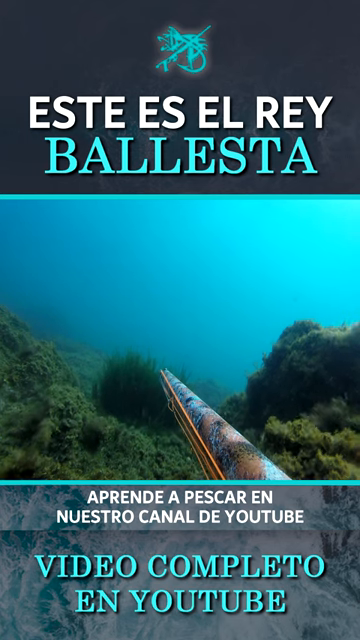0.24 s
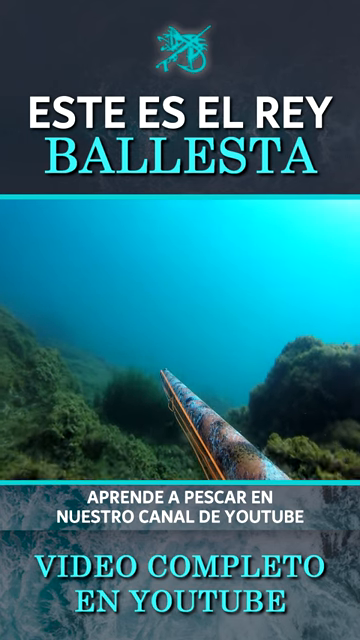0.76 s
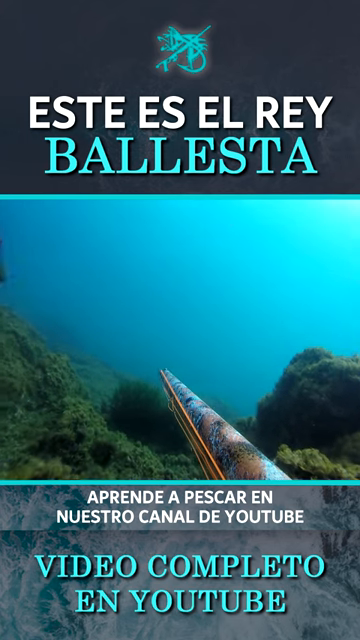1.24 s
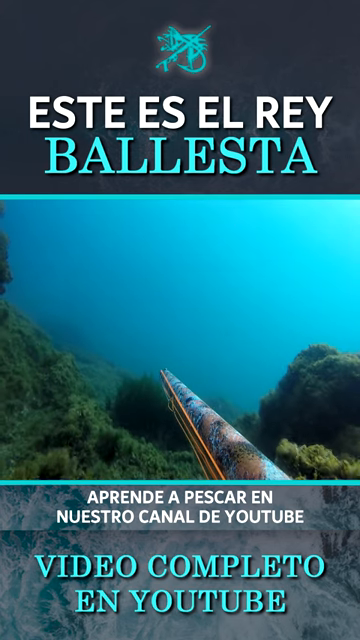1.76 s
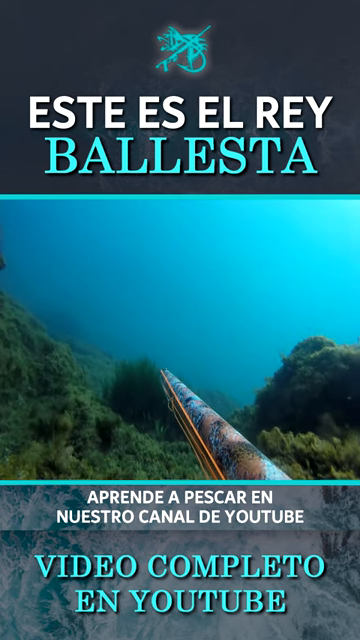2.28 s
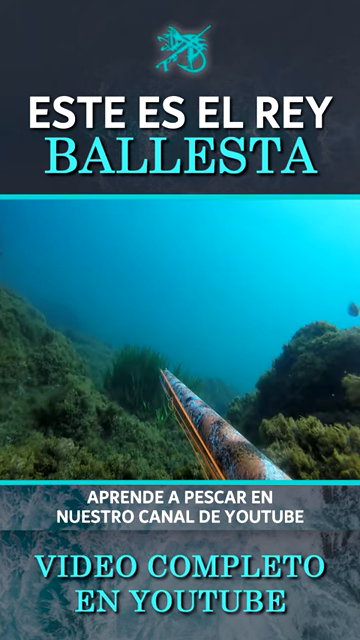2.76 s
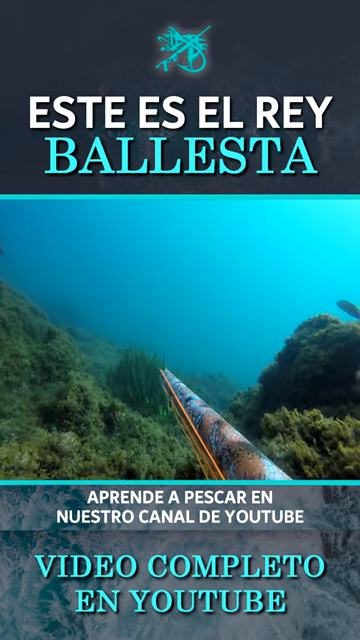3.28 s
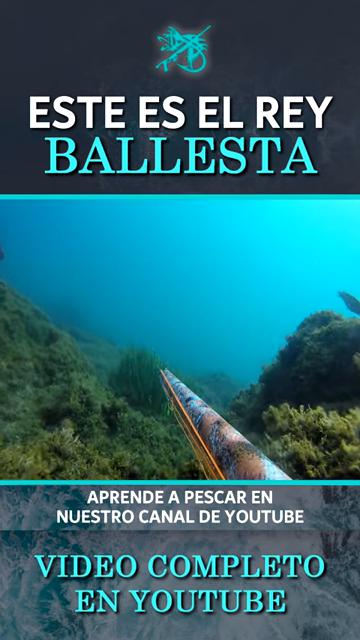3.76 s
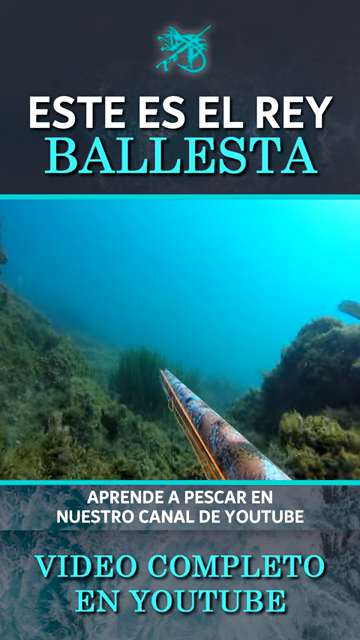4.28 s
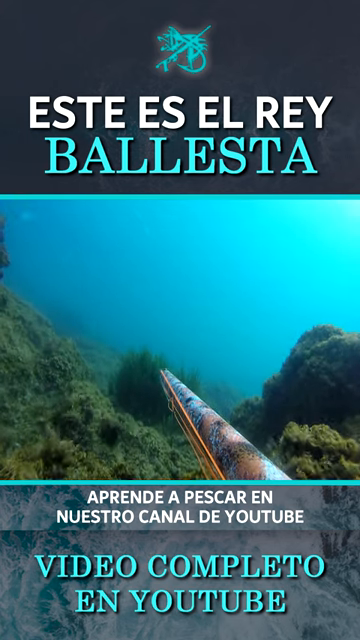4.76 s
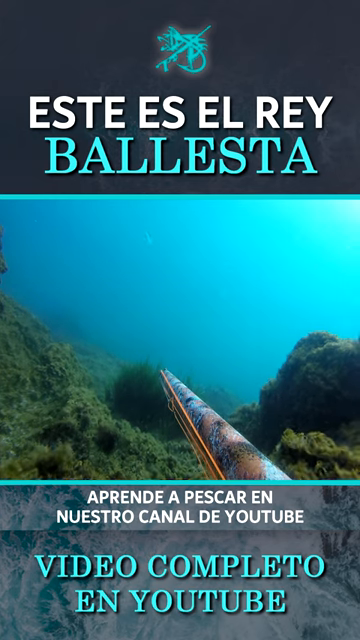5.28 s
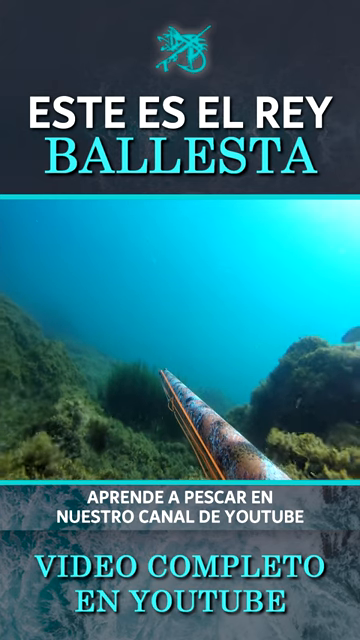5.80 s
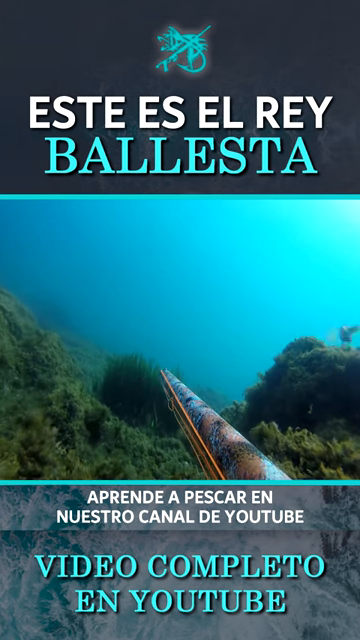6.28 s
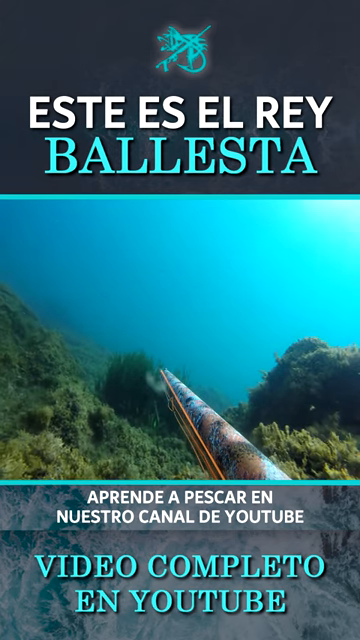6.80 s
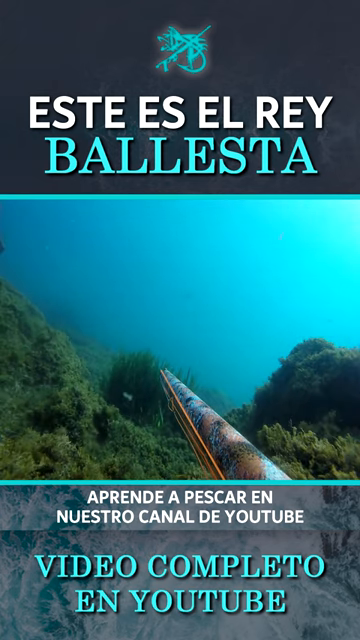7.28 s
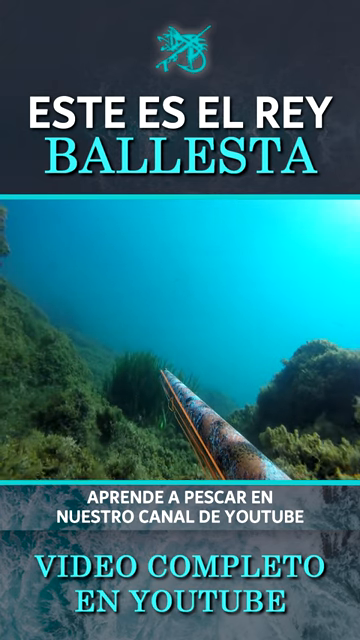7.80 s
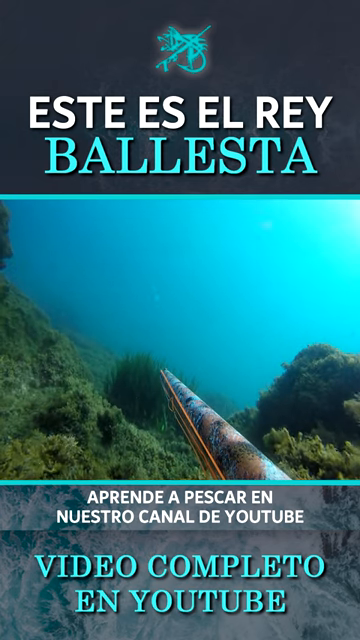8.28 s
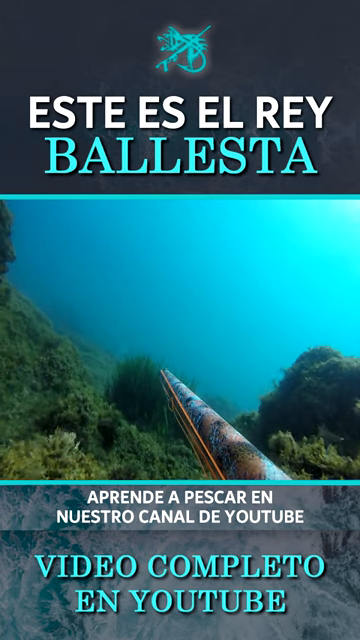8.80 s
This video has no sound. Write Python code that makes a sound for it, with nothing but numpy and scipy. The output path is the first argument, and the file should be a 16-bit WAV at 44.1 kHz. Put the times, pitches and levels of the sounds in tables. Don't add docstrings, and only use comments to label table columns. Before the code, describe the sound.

A microphone sealed in a housing on a speargun hears a rocky sea bed. Continuous soft hiss, fine crackle from countless distant shrimp and a very faint high whine fill the roughly nine seconds. In the first second the gun jolts, with dull knocks, low sway, buzzing shake and glove rubbing, amid small clicks. At 1.7 a dry, extremely loud snap cracks out, ringing briefly in the midrange. Another strong, softer-edged snap comes at 2.3, then a heavy thud and jolt at 2.45. Bright ticks cluster around 3.1; knocks return from 3.7 to 4.6, with low movement near 4. A sharp, loud double snap hits at 5.0. Scattered snaps continue, some crisp, some smeared by rocks, with a dull knock and shake around 6.5 and another at 7.7. The handling then calms; fuller snaps sound at 8.2 and 8.6, with smaller clicks to the end.

```python
import sys
import numpy as np
from scipy import signal
from scipy.io import wavfile
from scipy.ndimage import uniform_filter1d

SR = 44100
rng = np.random.default_rng(int(sys.argv[2]) if len(sys.argv) > 2 else 0)


def nominal_scale(level):
    x = np.asarray(level, float) / 20
    return 10 ** x


def store_pcm(level_fs):
    pcm = np.round(np.clip(level_fs, -1, 1) * 32767).astype(np.int16)
    wavfile.write(sys.argv[1], SR, np.atleast_2d(pcm).T)


N = 399105

# f/Hz, width/Hz, level/dB
HOUSING = [(765, 112, -18), (1461, 83, -2), (1850, 170, -3), (2338, 325, -3.5), (2723, 165, 2.5),
           (3130, 77, -4.5), (3617, 160, -6), (4134, 650, -5), (5070, 350, -18), (6310, 260, -19.5)]
# f/Hz, width/Hz, level/dB
GRIP = [(213, 102, 5.5), (366, 65, 1), (518, 48, -6)]


def rms_one(x):
    return x / np.sqrt(np.mean(x ** 2) + 1e-20)


def band(x, low_hz, high_hz):
    return signal.sosfilt(signal.butter(2, [low_hz, high_hz], "band", fs=SR, output="sos"), x)


def steep(x, low_hz, high_hz):
    return band(band(x, low_hz, high_hz), low_hz, high_hz)


def steady(x):
    return x / np.sqrt(uniform_filter1d(x ** 2, size=5000) + 1e-12)


def fading(x, rate_per_s):
    return signal.lfilter([1], [1, -np.exp(-rate_per_s / SR)], x)


def resonate(x, modes):
    out = np.zeros(x.shape)
    for hz, width, db in modes:
        r = np.exp(-np.pi * width / SR)
        poles = [1, -2 * r * np.cos(2 * np.pi * hz / SR), r * r]
        out += nominal_scale(db) * signal.lfilter([1 - r * r, 0, r * r - 1], poles, x)
    return out


def arrivals(t60, build_ms, size):
    t = np.arange(size) / SR
    build = max(build_ms, 0.05) / 1000
    after = np.maximum(t - build, 0) / max(t60, 0.004)
    rise = np.minimum(0.25 + 0.75 * t / build, 1)
    swell = rise * (1.06 * nominal_scale(-200 * after) + 0.7 * nominal_scale(-50 * after))
    spikes = rng.standard_normal(size) * np.sqrt(rng.exponential(1, size)) * swell
    spikes[0] = 70 * np.exp(-build_ms / 0.5)
    return spikes


def add(out, s, peak_db, sound):
    at = round(s * SR)
    loudest = uniform_filter1d(sound ** 2, size=130).max()
    scaled = nominal_scale(peak_db - 7) * sound / np.sqrt(loudest)
    out[at:at + len(sound)] += scaled[:N - at]


def hiss():
    # f/Hz, level per Hz/dB
    colour = [(26, -35), (45, 5.5), (583, -8.5), (781, -8.5), (1100, -13), (1440, -11), (1880, -12),
              (2020, -14), (2710, -11), (3460, -19.5), (6690, -23), (7930, -27), (12600, -33.5),
              (15300, -43)]
    # f/Hz, level/dB
    tones = [(8000, -84), (9000, -87), (12000, -95)]
    edges = 40 * 2 ** np.arange(0, 8.8, 1 / 5)
    white = rng.standard_normal((2, N))
    hz, db = np.transpose(colour)
    noise = np.zeros(N)
    for k, (low, high) in enumerate(zip(edges, edges[1:])):
        band_db = np.interp(np.log(low * high) / 2, np.log(hz), db)
        noise += nominal_scale(band_db) * band(white[k % 2], low, high)
    t = np.arange(N) / SR
    whine = sum(nominal_scale(level) * np.sin(2 * np.pi * f * t) for f, level in tones)
    return nominal_scale(-56) * rms_one(noise) + whine


def far_snaps():
    snaps_per_s = 250
    born = (rng.random(N) < snaps_per_s / SR) * nominal_scale(7.1 * np.minimum(rng.exponential(1, N), 3))
    smear = fading(born, 150)
    crowd = steep(resonate(smear * rng.standard_normal(N), HOUSING), 820, 4110)
    return nominal_scale(-63.5) * rms_one(crowd)


def crackle():
    snaps_per_s = 48
    sizes = nominal_scale(2.1 * np.minimum(rng.exponential(1, N), 3.5)) * (rng.random(N) < snaps_per_s / SR)
    dealt = rng.integers(0, 3, N)
    grit = rng.standard_normal(N)
    colours = [(3420, 6400, -6.5), (6900, 8900, 2), (8460, 13000, -18)]
    out = np.zeros(N)
    for k, (low_hz, high_hz, db) in enumerate(colours):
        struck = sizes * (0.38 + (dealt == k))
        smear = fading(struck, 900) + 0.18 * fading(struck, 120)
        out += nominal_scale(db) * band(smear * grit, low_hz, high_hz)
    return nominal_scale(-70.5) * rms_one(out)


def jolted(rest_db, s, peak_db, hold_s, fall_db_per_s):
    t = np.arange(len(rest_db))[:, None] / 100
    rise_db = 350 * np.maximum(s - t, 0)
    fall_db = fall_db_per_s * np.maximum(t - s - hold_s, 0)
    power = nominal_scale(2 * rest_db) + nominal_scale(2 * (peak_db - rise_db - fall_db)).sum(axis=1)
    return np.interp(np.arange(N) / SR, t[:, 0], np.sqrt(power))


def hand():
    # t/s, level/dB
    restless = [(0, -45.5), (.7, -50), (1.1, -51), (2.39, -62.5), (2.97, -58), (4, -49), (4.33, -53),
                (6.37, -60.5), (6.78, -54.5), (7.6, -54), (7.8, -67), (9.05, -66)]
    # t/s, stock shake level/dB, sway level/dB, rubbing level/dB, hold/s
    jolts = [
        (.01, -37.5, -41, -31.5, 0.024),
        (0.294, -53, -53, -46, 0.093),
        (.52, -51.5, -48, -56, 0.045),
        (0.705, -65, -52, -45, 0.19),
        (0.768, -44, -36, -61, 0.097),
        (2.475, -37.5, -43.5, -36, 0.024),
        (2.57, -47, -40, -49, 0.023),
        (4.014, -56.5, -44.5, -53, 0.027),
        (6.476, -49, -55, -52, 0.12),
        (7.557, -60, -54.5, -53, 0.031),
    ]
    unrest = np.interp(np.arange(N * 100 // SR + 2) / 100, *np.transpose(restless))
    s, shake_db, sway_db, rub_db, hold_s = np.transpose(jolts)
    sway = jolted(unrest - 5, s + 0.051, sway_db, hold_s, 112)
    shake = jolted(-78 + (unrest + 55), s, shake_db, hold_s, 121)
    rubbing = jolted(-56.5 + 0.42 * (unrest + 55), s, rub_db, hold_s, 146)
    white = rng.standard_normal((3, N))
    slips = fading((rng.random(N) < 60 / SR) * rng.exponential(1, N), 120)
    rub = resonate(white[2] * (1 + 0.5 * slips), GRIP + [(727, 110, 6)])
    rub = steep(rub, 80, 840)
    swing = steady(steep(white[0], 12.2, 31.2))
    buzz = steady(band(band(white[1], 64.9, 76.2), 25, 143))
    return nominal_scale(5.0) * sway * swing + shake * buzz + nominal_scale(-10.0) * rubbing * rms_one(rub)


def knocks():
    # t/s, peak level/dB, deep level/dB, bright level/dB, echo t60/s
    blows = [(0.009, -33, -6, -17, 0.031), (0.066, -36, 3, -8, 0.12), (0.271, -54.5, 10, -8, 0.055),
             (0.355, -45, 3, -4, 0.11), (0.518, -46.5, -6, -1, 0.033), (0.614, -41, -15, -14, 0.034),
             (0.725, -54.5, 11, -12, 0.022), (0.828, -43, -1, -11, 0.073), (2.446, -25, -5.5, -21, 0.042),
             (2.536, -35, -20, -11, 0.024), (2.605, -45.5, 3.5, -6, 0.04), (2.724, -49, 5.5, -12, 0.12),
             (3.666, -38.5, -33, -13, 0.025), (3.901, -40, -29, -20, 0.017), (4.082, -41, -11, -15, 0.05),
             (4.167, -38, -19, -11, 0.087), (4.203, -33, -10.5, -25, 0.1), (4.645, -42, -20, -6, 0.099),
             (6.509, -37, -4.5, -5, 0.16), (7.683, -33, -6.5, -4, 0.071)]
    out = np.zeros(N)
    for s, peak_db, deep_db, bright_db, t60 in blows:
        spikes = arrivals(t60, 1.01, size=5000)
        plate = steep(resonate(spikes, [(780, 160, 0)]), 500, 1000)
        deep = band(resonate(spikes, GRIP), 120, 650)
        bright = steep(spikes, 1150, 1900)
        add(out, s, peak_db + 0.082, plate)
        add(out, s, peak_db + deep_db + 4.5, deep)
        add(out, s, peak_db + bright_db + 0.1, bright)
    return out


def all_snaps():
    # t/s, peak level/dB, high modes level/dB, echo
    # t60/s, build-up/ms
    close = [(0.0586, -33, -24, 0.037, 2.2), (0.173, -33, -6.5, 0.039, 1.5),
             (1.0029, -33.5, -3, 0.047, 0.66), (1.1354, -34, -17, 0.079, 1.8),
             (1.6975, -4, -6.5, .034, 0.065), (1.762, -36, -6, 0.066, 0.92),
             (2.2885, -14.5, -15.5, 0.047, 2.6), (2.642, -28, -7.5, 0.084, 5.3),
             (3.1755, -28, -21, 0.079, 1.4), (3.4165, -26, -15, 0.072, 1.9),
             (4.2955, -31, -11.5, 0.12, 4.1), (5.0105, -11.5, -4, 0.036, 0.61),
             (5.0125, -11.5, -27, 0.034, 0.56), (5.913, -34.5, -8.5, 0.11, 1.8),
             (6.2186, -25, -23, 0.087, 1.2), (6.5002, -30, -31, .081, 2),
             (6.7646, -31.5, -10.5, 0.048, 3.1), (6.8164, -26.5, -11, 0.069, 6.7),
             (7.2002, -33, -0.5, 0.095, 0.97), (7.6062, -31.5, 3, 0.075, 0.74),
             (8.2112, -18.5, -16, 0.046, 6.7), (8.4033, -32, -5.5, 0.049, 1.7),
             (8.5631, -22.5, -6, 0.071, 2.2), (8.985, -30, -8, 0.075, 3.3)]
    # t/s, peak level/dB, high modes
    # level/dB
    crisp = [(0.377, -42, -7.5), (.4388, -44.5, -11), (0.5648, -33.5, -20), (0.7497, -36.5, -7.5),
             (.8904, -39.5, -13), (1.4473, -35.5, -17), (1.52, -44, -6), (1.5446, -40.5, -5),
             (1.5592, -40, -26), (1.723, -37.5, -8), (2.4453, -44.5, -8.5), (2.6897, -42.5, -6),
             (3.053, -44, 4.5), (3.224, -37.5, -1), (3.4864, -39.5, -9.5), (3.674, -37.5, -11),
             (3.7622, -41, -2), (4.0322, -37.5, -9), (4.8912, -42, -9), (5.1506, -43, -25),
             (5.5739, -37, -5), (5.9793, -42.5, -8), (6.0375, -39, -8), (6.429, -42, -27),
             (7.4145, -41.5, -5.5), (7.4426, -41, -18), (7.6649, -37, -14), (7.8516, -36, -10),
             (7.8659, -37, -26), (8.9052, -42.5, -10)]
    # t/s, peak level/dB
    faint = [(0.009, -41.5), (.9258, -41.5), (1.0383, -45), (1.8383, -45), (2.3431, -45.5), (2.4815, -43.5),
             (2.8155, -45), (4.392, -42), (4.844, -43), (5.7517, -43.5), (6.6616, -41.5), (6.8667, -39),
             (6.9858, -43.5), (7.7082, -47.5), (8.3473, -48), (8.46, -46), (8.7138, -44), (8.8674, -43.5)]
    # t/s, peak level/dB, high modes level/dB, build-up/ms
    blurred = [(0.1783, -41, -6, 16), (1.2531, -38.5, -17, 5.4), (1.349, -39, -26, 10),
               (1.4698, -40.5, -12, 12), (1.8774, -41, -12, 4.1), (2.912, -37, -17, 2.8),
               (3.0733, -38.5, -2.5, 5.9), (3.3102, -42.5, -27, 3.3), (4.3439, -35, -12.5, 4.2),
               (4.7997, -38.5, -22, 2.8), (5.1792, -33.5, -9.5, 4), (5.6023, -33.5, -10.5, 1.7),
               (5.868, -36.5, -10, 1), (6.1493, -43, -9, 8), (6.3853, -40, -7, 1.5),
               (6.5719, -41.5, -11, 4.4), (6.5972, -41.5, -12, 5.2), (6.745, -40, -15, 4.8),
               (6.876, -45, 10, 9.7), (7.9293, -39.5, -6.5, 0.72), (8.1748, -34.5, -19, 2.7),
               (8.327, -39.5, -9, 5.7), (8.6227, -39.5, -4.5, 4), (8.742, -38, -15, 3.9),
               (8.7539, -40, -4, 8.2), (8.8224, -38, -5, 1.05)]
    open_water = crisp + [(s, db, -11) for s, db in faint]
    open_water = [(*row, 0.075, 1.4) for row in open_water]
    rocks = [(s, db, high_db, 0.12, build_ms) for s, db, high_db, build_ms in blurred]
    return np.transpose(close + open_water + rocks)


def snaps():
    out = np.zeros(N)
    fade = nominal_scale(-900 * np.arange(4000) / SR)
    low, warm, main, high = HOUSING[:1], HOUSING[1:3], HOUSING[3:6], HOUSING[6:]
    s, peak_db, high_db, t60, build_ms = all_snaps()
    spikes = np.array([arrivals(*row, size=4000) for row in zip(t60, build_ms)])
    near = np.exp(-build_ms / 0.5)
    warm_gain = nominal_scale(-10 * near ** 3)[:, None]
    middle = resonate(spikes, main) + warm_gain * resonate(spikes, warm)
    bright = steep(resonate(spikes * fade, high), 2250, 12000)
    layers = [(peak_db, steep(middle, 1330, 3050)),
              (peak_db - 13.5 - 13 * near ** 3, resonate(band(spikes, 430, 1030), low)),
              (peak_db - 30, band(resonate(spikes, GRIP), 280, 980)),
              (peak_db + high_db, band(bright, 2200, 6950))]
    for db, sounds in layers:
        for row in zip(s, db, sounds):
            add(out, *row)
    return out


def ticks():
    # t/s, peak level/dB, top level/dB
    thin = [(.0483, -34, -21), (.2418, -42, -20), (.6355, -32.5, -28), (1.8023, -44, -29),
            (2.5326, -37, -26), (2.6908, -27.5, -38), (3.053, -24, -23), (3.0744, -24.5, -20),
            (3.1203, -33, -30), (3.2251, -30, -20), (3.5997, -41, -25), (3.7618, -31, -33),
            (3.8487, -31, -27), (3.917, -36, -25), (4.1964, -27.5, -36), (4.8439, -36, -34),
            (4.9541, -39, -22), (5.01, -21, -23), (5.2734, -39, -23), (6.2183, -31, -33),
            (6.5006, -31, -27), (6.8703, -34, -25), (6.8838, -33, -24), (7.1013, -33.5, -28),
            (7.2, -27.5, -32), (7.3936, -31, -33), (8.0232, -31, -31), (8.4058, -30, -26),
            (8.9351, -34, -33), (9.0299, -31.5, -32)]
    out = np.zeros(N)
    s, peak_db, high_db = all_snaps()[:3]
    edge_db = -16 + 0.53 * np.minimum(peak_db + high_db, -22)
    rows = thin + [(at, db, -23) for at, db in zip(s, edge_db)]
    spikes = np.array([arrivals(0.034, 0.61, size=1200) for row in rows])
    lows = steep(spikes, 6800, 9800)
    tops = band(spikes, 10500, 14500)
    for (at, db, top_db), low, top in zip(rows, lows, tops):
        add(out, at, db - 14.5, low)
        add(out, at, db + top_db + 3, top)
    return out


def scene():
    mix = hiss() + far_snaps() + crackle() + hand() + knocks() + snaps() + ticks()
    return mix[None]


def low_pass(x):
    return signal.sosfilt(signal.butter(12, 15480, fs=SR, output="sos"), x)


def record(dry):
    cut = signal.cheby2(10, 50, 15900, fs=SR, output="sos")
    mix = signal.sosfilt(cut, dry)
    return low_pass(mix)


dry = scene()
out = record(dry)
store_pcm(out)
```